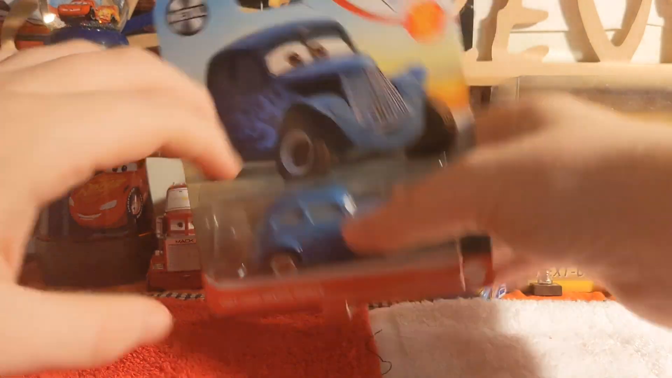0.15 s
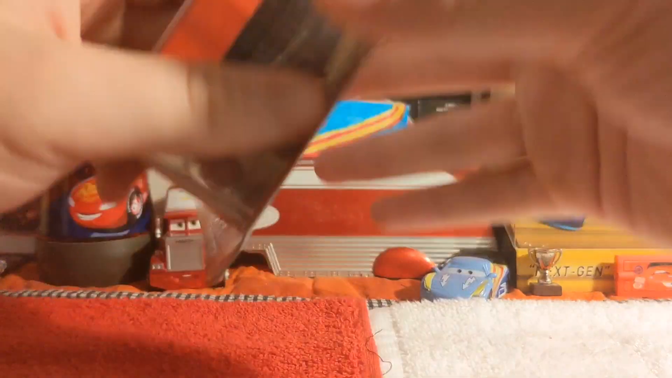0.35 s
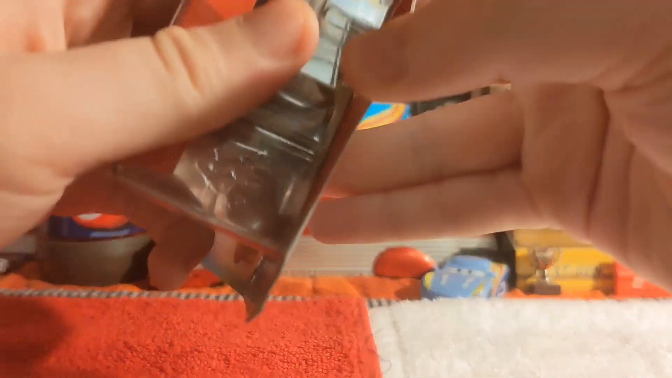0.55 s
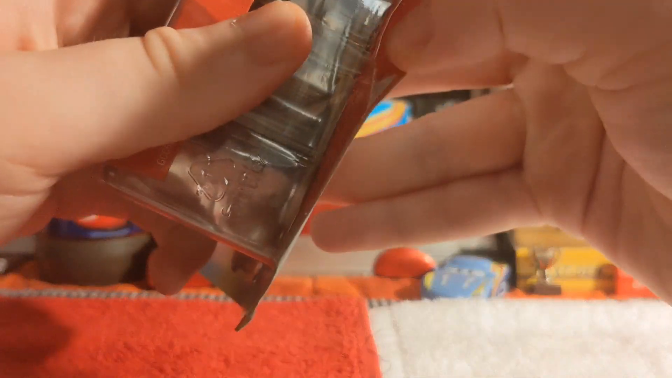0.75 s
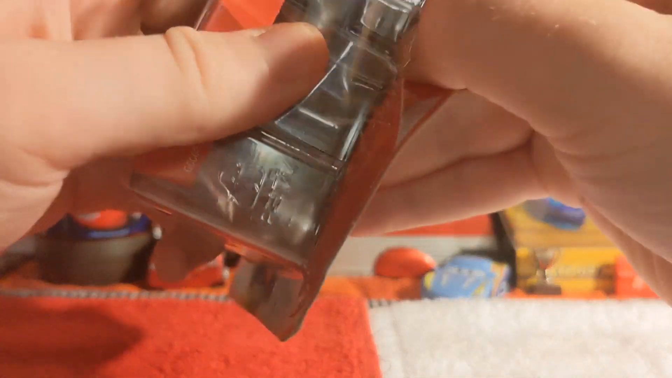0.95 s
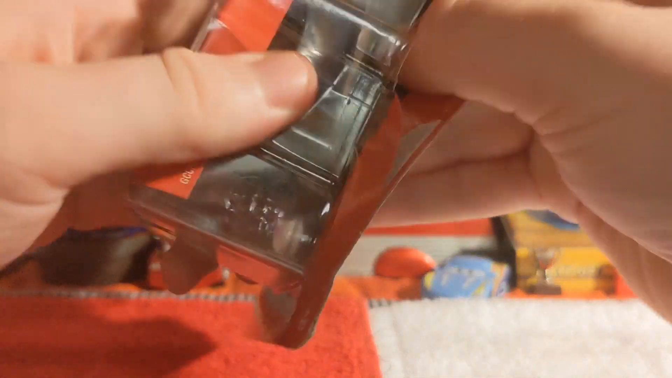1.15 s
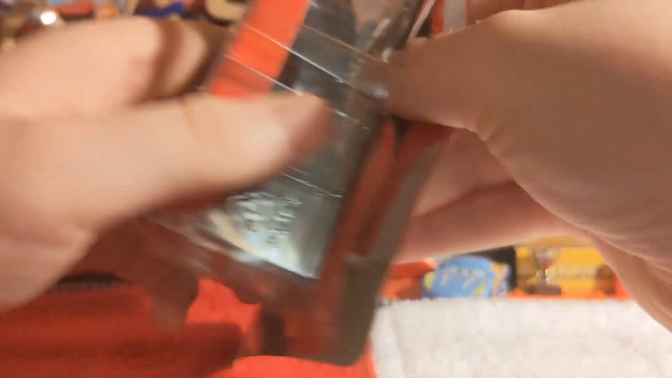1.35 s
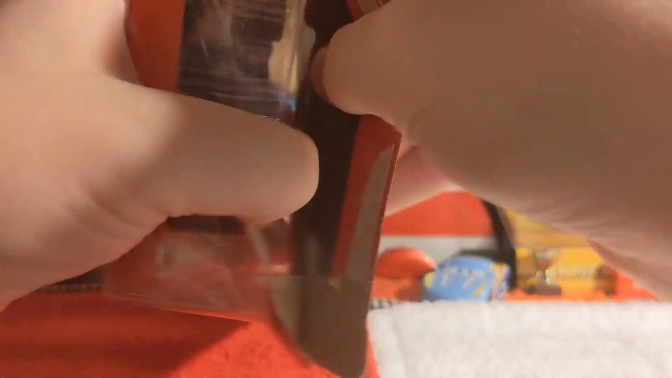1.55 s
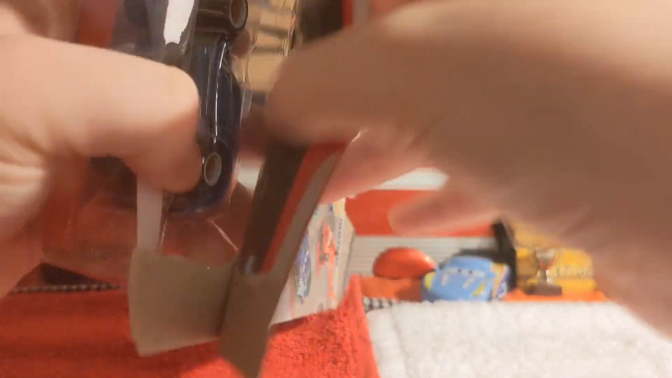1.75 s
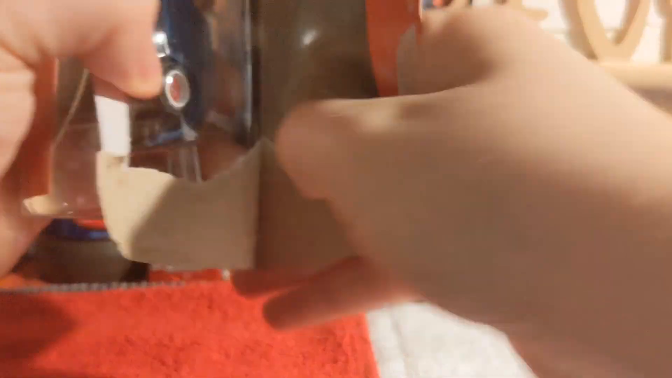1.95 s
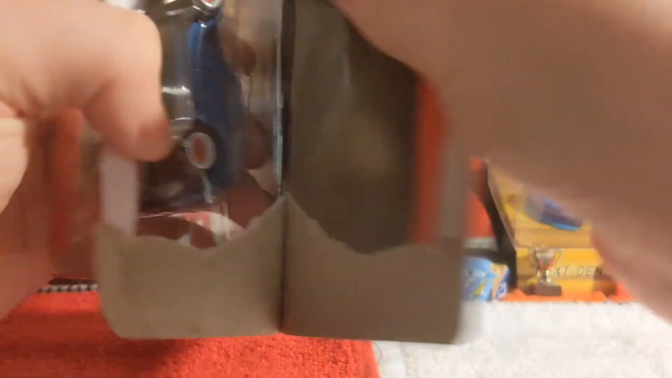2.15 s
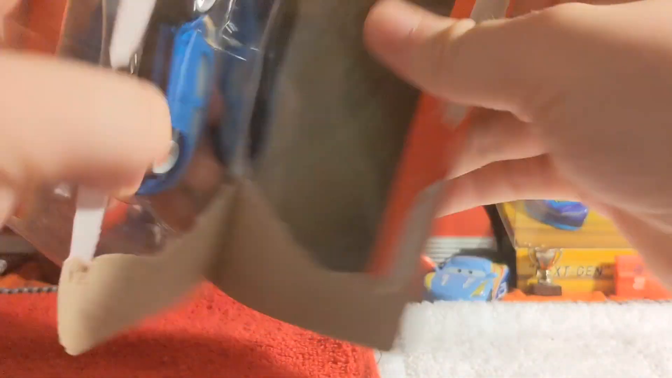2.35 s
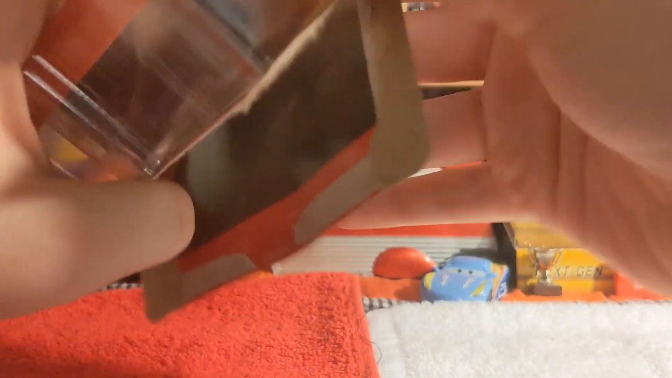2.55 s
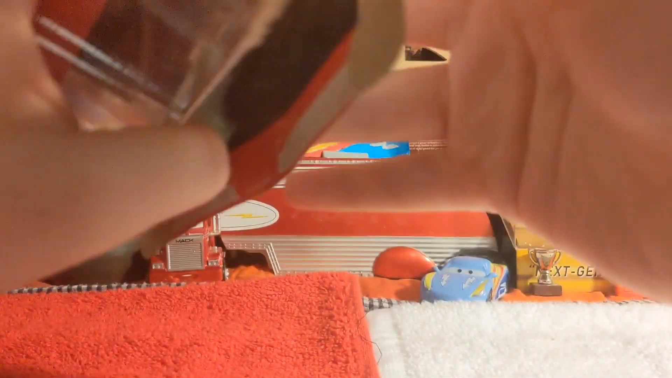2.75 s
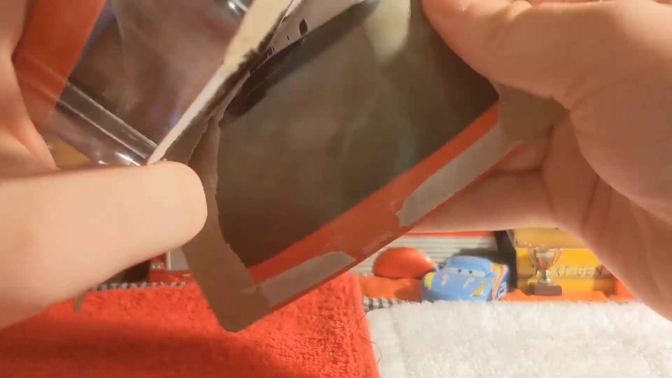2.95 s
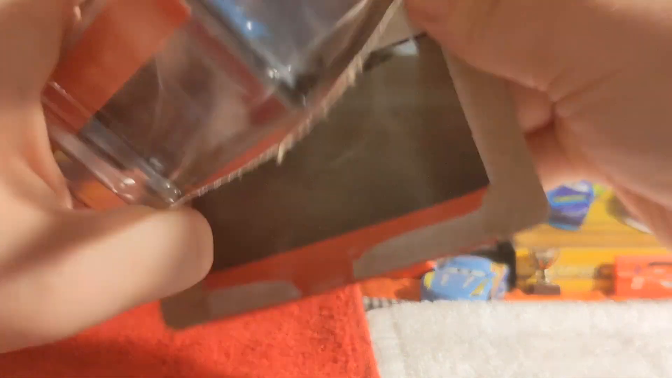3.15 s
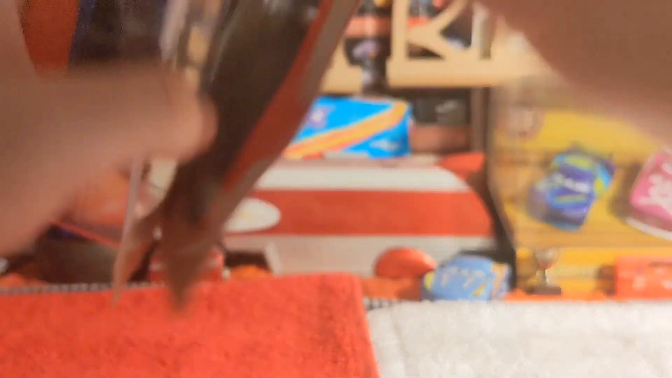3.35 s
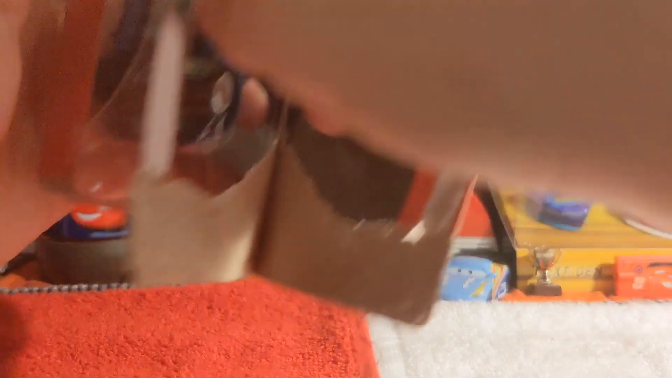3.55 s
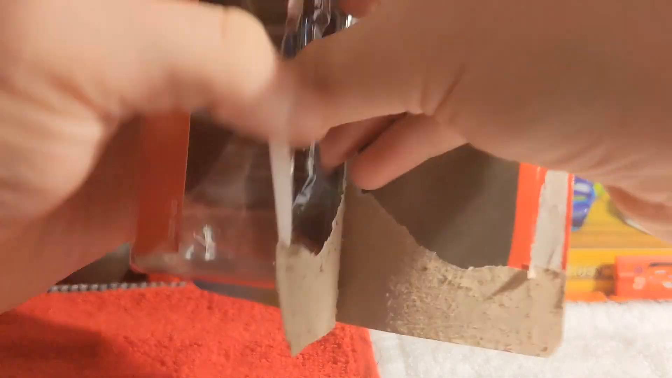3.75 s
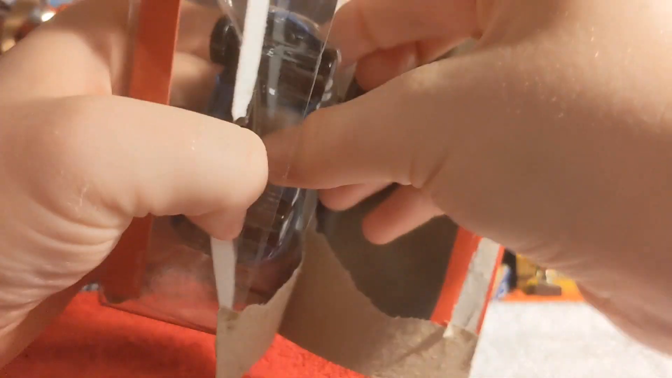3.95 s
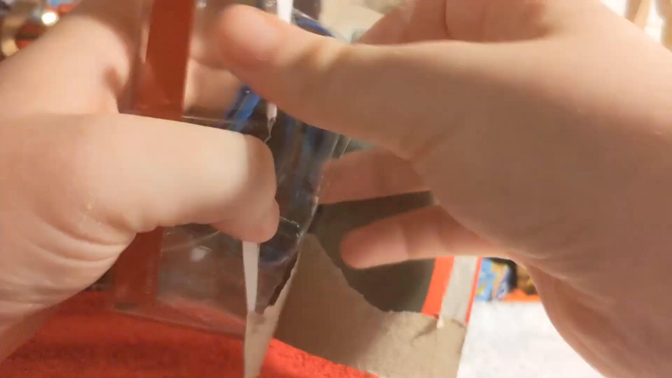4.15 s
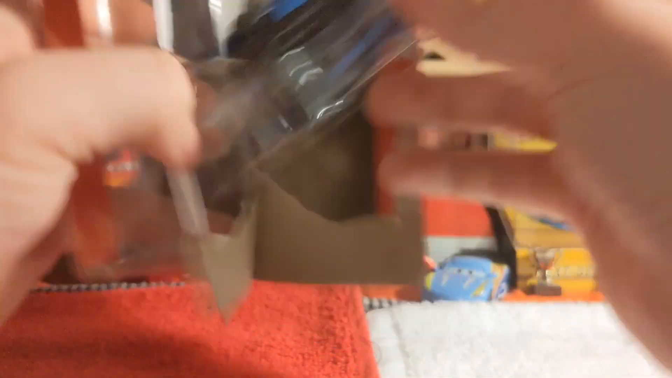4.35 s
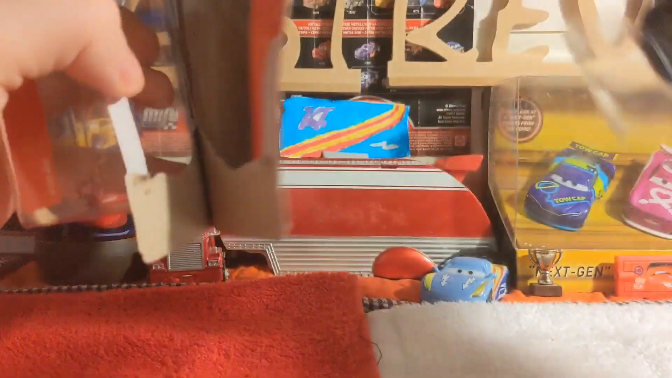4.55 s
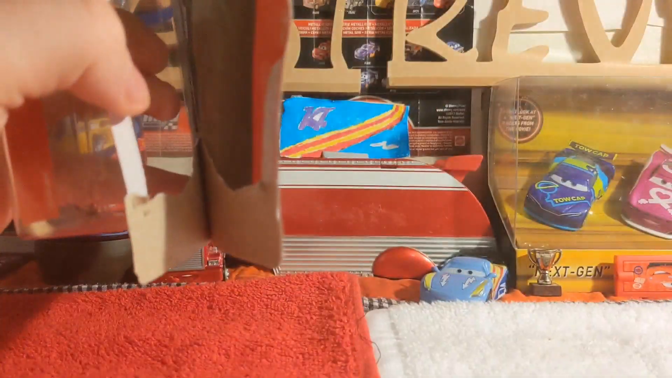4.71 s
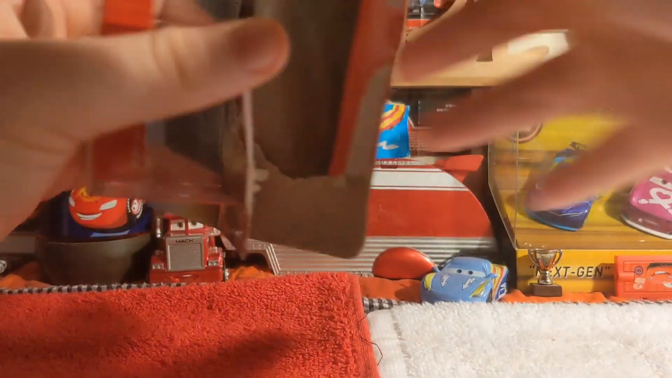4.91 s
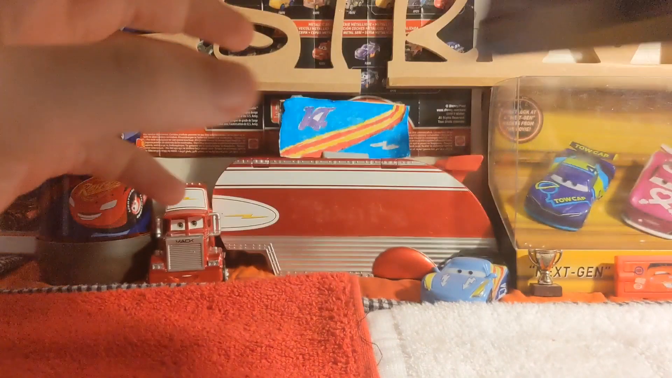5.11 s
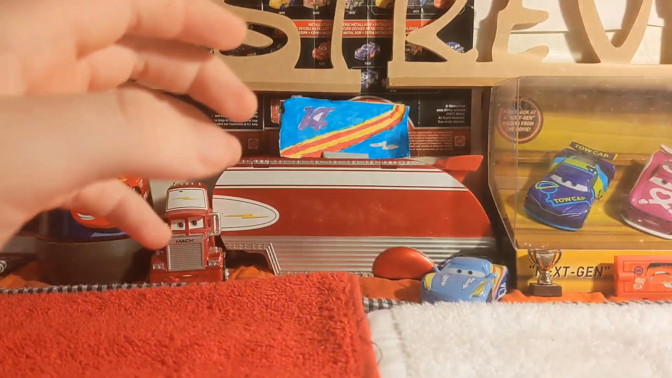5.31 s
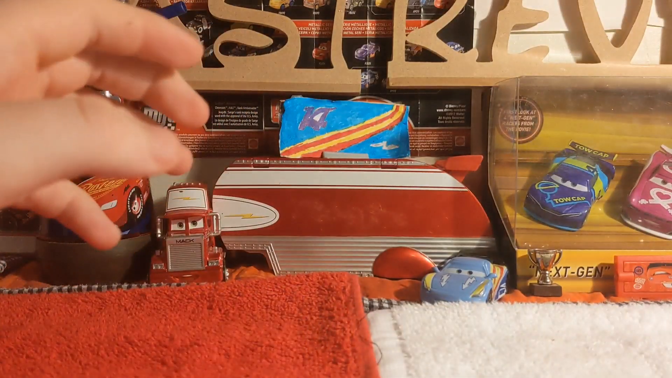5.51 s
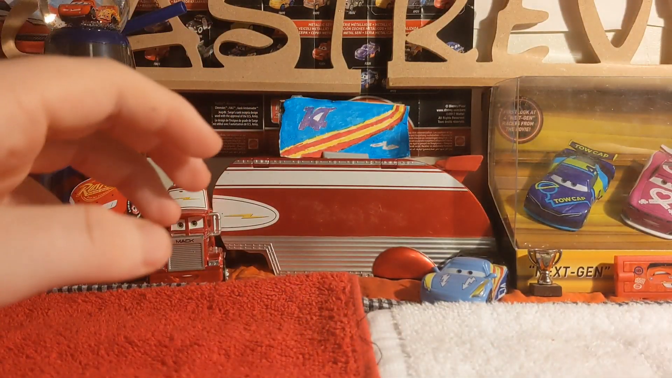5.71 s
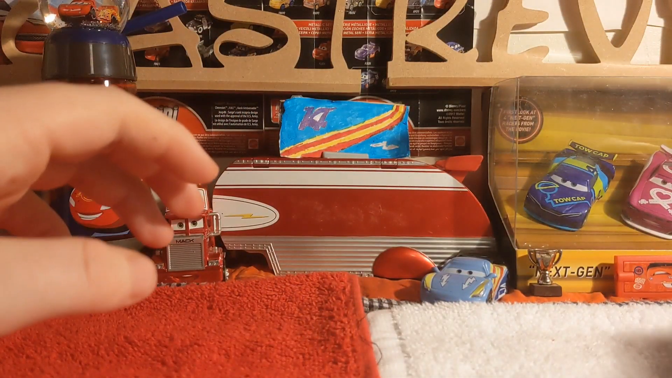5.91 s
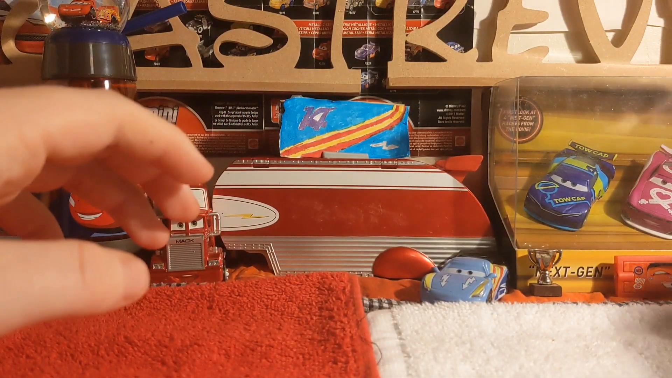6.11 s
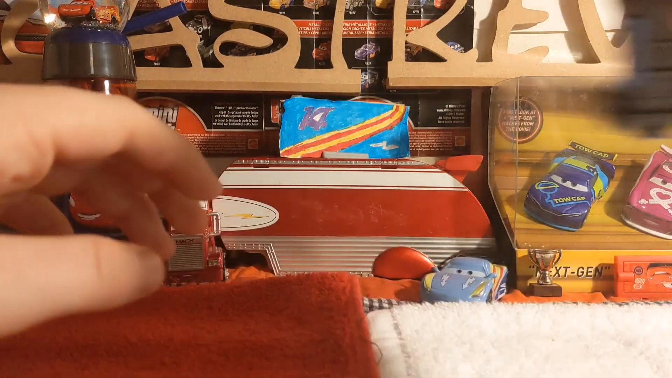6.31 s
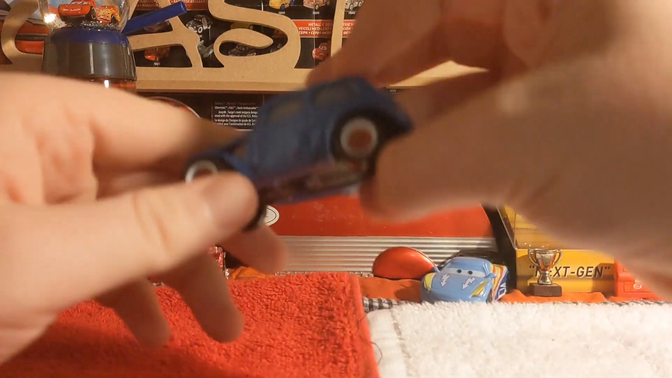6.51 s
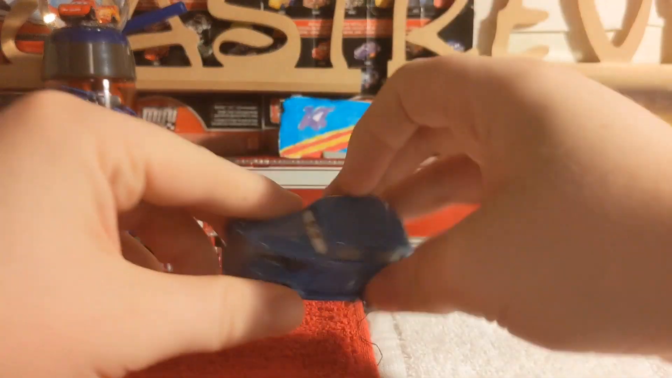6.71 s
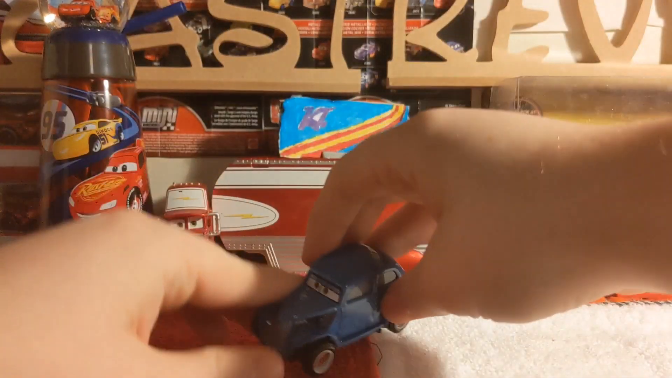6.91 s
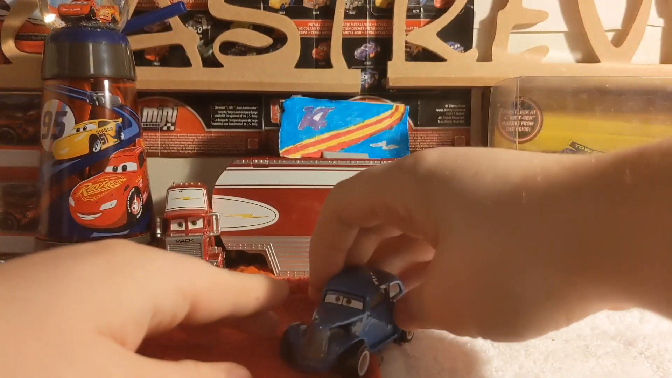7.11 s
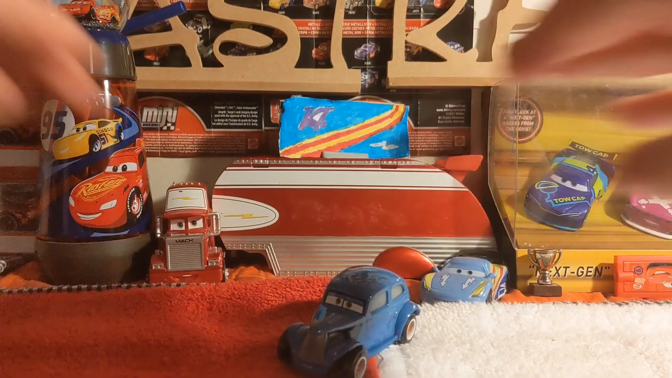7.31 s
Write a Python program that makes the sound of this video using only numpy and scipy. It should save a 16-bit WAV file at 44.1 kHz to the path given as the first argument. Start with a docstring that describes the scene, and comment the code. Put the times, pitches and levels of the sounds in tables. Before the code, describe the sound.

Everything is in the right channel, close and dry, over a faint steady room tone; the left is practically silent. Slight finger brushing and small pops open the scene. From about 0.6 s stiff plastic snaps sharply, crowding together between 0.9 and 1.8 s, with short fibrous cardboard rips near 1.25, 1.7 and 1.95 s and low jolts of the hands. From 2 to 2.9 s it eases to crinkles and light rubbing. A harder crackling rip comes at 2.97 s, then the densest, loudest snaps from 3.55 to 4.3 s, and a last tear around 4.4 s. After a lull, the emptied pack rustles and slides with a hollow stutter at 5.3-5.6 s. Faint handling follows; small bright ticks of the toy car come from 6.4 to 7 s, and a very soft bump and brush on the towel around 7.3 s.

```python
"""Fingers brush faintly, then plastic snaps: hands rip the card back off a toy car's blister, right ear only.
Shell snaps and dull panel pops are noise slips and single notes kicked through the pack's resonances.
Short crackling pulls are bursts of breaking fibres; the hands add low rustle and soft jolts.
The emptied pack slides with a hollow ring, the car ticks and is set down softly on a towel.
Sparse, fast-dying reflections and a steady room tone give the small room."""
import sys
import numpy as np
from scipy import signal
from scipy.io import wavfile
from scipy.ndimage import uniform_filter1d

SR = 44100
rng = np.random.default_rng(int(sys.argv[2]) if len(sys.argv) > 2 else 0)


def waveform_to_disk(signal):
    """Save audio, clipped to [-1, 1], as 16-bit WAV at the path in sys.argv[1]."""
    frames = np.transpose(np.atleast_2d(signal))
    scaled = np.clip(frames, -1, 1) * 32767
    samples = np.round(scaled).astype(np.int16)
    wavfile.write(sys.argv[1], SR, samples)


N = 329427
TIME = np.arange(N) / SR  # s

# Table levels are relative: each source trims them, and the microphone gain comes last.
# loud buckles of the blister: start_s, shell_db, panel_db, crack_db, panel_hz, rib_hz
BUCKLES = [(0.1402, -32, -30, -51, 660, 2040), (0.178, -38, -50, -70, 734, 1540),
           (0.2781, -25, -33, -44.5, 650, 2620), (0.396, -58, -75, -50, 996, 2800),
           (0.6222, -16, -37, -42.5, 684, 2630), (0.6416, -12, -37.5, -28, 707, 2840),
           (0.6955, -29.5, -70, -47, 1060, 3050), (0.7668, -13, -41, -19.5, 724, 2880),
           (0.8844, -11, -25.5, -33, 895, 1870), (0.8914, -13.5, -36, -44, 805, 2400),
           (0.942, -30, -38.5, -40.5, 896, 1710), (0.9754, -27, -29, -48, 710, 2380),
           (0.9911, -30, -29.5, -37, 556, 1800), (1.0097, -6.5, -29.5, -25, 950, 2540),
           (1.0325, -14.5, -34, -20.5, 674, 3400), (1.1129, -17.5, -28.5, -37.5, 819, 2540),
           (1.1861, -12, -34.5, -45, 805, 2880), (1.205, -29, -35.5, -38.5, 696, 1490),
           (1.2204, -16, -30, -31, 773, 2940), (1.2494, -16, -19.5, -22, 1050, 3160),
           (1.3197, -10, -25.5, -25, 910, 2690), (1.3241, -7.5, -37.5, -19, 910, 3030),
           (1.3457, -10.5, -32.5, -29.5, 600, 2940), (1.3593, -11.5, -36.5, -27, 1047, 2760),
           (1.5087, -10.5, -26.5, -27, 1045, 3180), (1.5977, -8.5, -22, -19, 1056, 1720),
           (1.623, -23, -32.5, -48, 1020, 2100), (1.6346, -25, -29, -36, 850, 1870),
           (1.6598, -13.5, -27, -25.5, 750, 3110), (1.6862, -13, -25, -29.5, 1330, 1450),
           (1.7114, -7.5, -31.5, -47, 1260, 1880), (1.733, -7.5, -39, -48, 1210, 1880),
           (1.7526, -15, -34.5, -30.5, 1086, 3610), (1.7879, -15, -35, -36.5, 1250, 3460),
           (1.8474, -25, -49, -48, 870, 2780), (1.952, -11, -26, -33, 736, 2820),
           (2.0264, -32, -39, -47.5, 525, 2890), (2.0557, -33, -42.5, -60, 848, 1400),
           (2.167, -29.5, -46, -59, 866, 3360), (2.2044, -33, -40, -45, 713, 2100),
           (2.3391, -35, -65, -41, 781, 3110), (2.4028, -27, -38.5, -66, 860, 1960),
           (2.6898, -21, -40.5, -41, 666, 2110), (2.7194, -28, -46, -47, 830, 1940),
           (2.825, -47, -42, -68, 810, 1800), (2.9642, -13.5, -28, -46, 760, 3120),
           (2.9767, -13.5, -28, -30.5, 730, 2850), (3.1043, -26.5, -42.5, -44, 885, 3060),
           (3.1348, -13.5, -31.5, -34.5, 805, 2780), (3.5524, -26, -33.5, -42, 900, 1400),
           (3.5565, -19.5, -32.5, -39.5, 923, 3330), (3.5979, -21.5, -34.5, -45, 1084, 3310),
           (3.6093, -19.5, -30, -51, 1310, 1400), (3.6696, -18.5, -28.5, -27, 960, 1940),
           (3.676, -11.5, -31, -30, 880, 1810), (3.7398, -14.5, -31, -30.5, 900, 1870),
           (3.7577, -4.5, -24, -25, 910, 3060), (3.7838, -6.5, -28.5, -25.5, 1310, 1960),
           (3.813, -15.5, -27, -55.5, 780, 2170), (3.8686, -27, -36, -43, 1120, 2130),
           (3.9, -5.5, -30, -20, 890, 3330), (4.0167, -31, -27, -55, 549, 1490),
           (4.0525, -19, -26, -61, 1163, 1470), (4.1268, -6, -20.5, -29, 864, 2220),
           (4.1342, -18, -21.5, -41, 860, 2320), (4.1473, -9, -34.5, -34.5, 1120, 3080),
           (4.2257, -21.5, -37.5, -44.5, 856, 2540), (4.2522, -8, -21.5, -31.5, 810, 3070),
           (4.2564, -15.5, -21.5, -41, 937, 3140), (4.3554, -30, -40.5, -57, 720, 2470),
           (4.7355, -28.5, -36, -50, 986, 1520), (4.7971, -32, -43, -44, 1020, 2810),
           (4.9921, -29, -42.5, -55, 1010, 2040), (5.0605, -23, -37, -46, 1190, 1850),
           (5.0714, -30, -40, -46, 891, 2720), (5.125, -25, -35.5, -54.5, 726, 2610),
           (5.137, -25, -38, -43, 1026, 3340), (5.3395, -30.5, -37, -52, 860, 1400),
           (5.3527, -29, -41.5, -51, 1018, 2760), (5.3734, -39, -39.5, -62, 910, 1410),
           (5.448, -23.5, -32, -43.5, 1300, 1400), (5.4588, -28.5, -30, -52, 866, 1730),
           (5.48, -39, -38.5, -63, 870, 1490), (5.5204, -49, -42, -62, 860, 1470),
           (5.5553, -32.5, -43, -63, 870, 1420), (5.6052, -36, -43.5, -60, 860, 1460),
           (5.9628, -20.5, -38.5, -47.5, 595, 1700), (6.0064, -36.5, -48, -60, 1190, 3400),
           (6.1474, -39, -48, -60, 717, 2860)]
# card rips that swell, then let go: climax_s, level_db, build_s, release_s, body_re_level_db, fizz_re_level_db
CARD_RIPS = [(1.254, -25.5, 0.018, 0.013, -1, -1.5), (1.68, -25, 0.022, 0.02, -3.5, -2.5),
             (1.96, -27, 0.024, 0.015, -5, -1), (2.97, -23.5, 0.016, 0.01, -10, -3),
             (4.418, -27.5, 0.022, 0.017, -12.5, -4.5)]
# card peels or slides on plastic: start_s, length_s, level_db, body_re_level_db, fizz_re_level_db
CARD_RUBS = [(0.298, 0.03, -47, -1.5, -7.5), (0.471, 0.12, -64, -5, -6), (0.684, 0.059, -56.5, -12, 1.5),
             (0.819, 0.1, -51, -10.5, -5.5), (0.941, 0.13, -47, -5, -3.5), (1.094, 0.046, -47.5, 4, -15),
             (1.325, 0.04, -44, -7.5, 2.5), (1.405, 0.04, -49.5, 2, -12.5),
             (1.478, 0.082, -49.5, 5.5, -10.5), (1.802, 0.027, -54, -13, -6), (1.892, 0.016, -39, -9, -5.5),
             (2.003, 0.089, -55, -0.5, -5), (2.117, 0.13, -45, -5.5, -4.5), (2.222, 0.061, -44.5, -11, 1),
             (2.278, 0.054, -46, -9.5, -4.5), (2.352, .045, -55, -0.5, -3),
             (2.411, 0.038, -41.5, -11, -4.5), (2.491, 0.039, -53.5, -5.5, -6.5),
             (2.584, 0.03, -48, -5.5, -5), (2.713, 0.044, -44.5, -4.5, -9), (2.819, 0.088, -46, -6.5, -5),
             (3.032, .075, -59, 1, -2), (3.169, .09, -46, -7, -1.5), (3.269, 0.1, -54.5, -1, -4.5),
             (3.406, 0.032, -55.5, 1.5, -8), (3.463, 0.16, -53, -1.5, -7), (3.633, .1, -45, -5, -5),
             (3.716, 0.11, -44, -2, -7.5), (3.903, 0.071, -42.5, 2, -12.5), (4.022, 0.14, -47, 0.5, -7.5),
             (4.196, 0.083, -49.5, 2.5, -11), (4.347, 0.05, -36, -2.5, -15), (4.463, 0.026, -40, -8.5, -9),
             (4.499, .06, -69, -3, 0.5), (4.721, 0.027, -45, 3, -9), (4.79, .018, -39.5, -3, -8),
             (4.975, .16, -53, 2, -5.5), (5.327, 0.28, -58, -2.5, -7.5), (5.774, 0.061, -65.5, 1.5, -7),
             (5.818, 0.22, -58, -3.5, -9), (6.079, 0.14, -62, 2, -10), (6.475, .18, -60.5, -12, -4),
             (7.29, 0.11, -69, -5, -3.5)]
# the emptied pack slides away: start_s, length_s, level_db
PACK_SLIDE = (5.34, 0.286, -51.5)
# hollow ring of the empty pack: pitch_hz, decay_s, level_db
HOLLOW_MODES = [(880, .007, 2), (1050, 0.0043, 0)]
# toy car ticks between the fingers: start_s, level_db, pitch_hz
WHEEL_TICKS = [(6.3712, -52.5, 2410), (6.4078, -47.5, 3510), (6.5179, -39.5, 2820), (6.6079, -40, 3100),
               (6.6414, -39.5, 2470), (6.7114, -47.5, 2480), (6.791, -48.5, 3290), (6.9819, -44.5, 2430)]
# the pack gives way and jolts the hands: start_s, level_db, pitch_hz
HAND_JOLTS = [(0.997, -39.5, 190), (1.253, -25.5, 283), (1.262, -41, 120), (1.54, -39.5, 240),
              (1.953, -42, 170), (2.752, -44, 110), (3.106, -39.5, 222), (3.189, -49, 70),
              (3.502, -42, 262), (4.129, -53, 198), (4.361, -37.5, 171), (4.412, -43, 64.5),
              (4.741, -49.5, 130.7), (4.801, -47, 80), (5.389, -47.5, 90), (5.45, -47, 228),
              (5.68, -54.5, 120), (6.146, -49.5, 159), (7.28, -57, 219)]
# moving hands: time_s, rustle_db, brush_db
HAND_MOTION = [(0.0, -83, -72.5), (0.6, -79, -70), (1.06, -86, -58.5), (1.56, -59, -58.5),
               (1.81, -58, -54.5), (2.49, -64.5, -63.5), (2.81, -54.5, -57.5), (3.51, -62, -66),
               (3.81, -59, -52), (4.28, -65, -57.5), (4.51, -78, -74.5), (4.89, -65.5, -66.5),
               (5.32, -73.5, -78.5), (5.51, -60, -72), (5.66, -65.5, -75.5), (5.93, -76, -72),
               (6.97, -77.5, -76.5), (7.47, -70.5, -73.5)]
# spectrum of the wide panels: freq_hz, gain_db
PANEL_SHAPE = [(25, -41), (130, -16), (260, -2), (400, -3), (600, 1.5), (880, 2.5), (1200, 1.5),
               (1600, -4.5), (3000, -52)]
# spectrum of the stiff shell: freq_hz, gain_db
SHELL_SHAPE = [(600, -31), (1100, -24), (1400, -8.5), (2200, -0.5), (2550, 1), (3050, 4), (3450, 1.5),
               (4000, -11.5), (5000, -17), (9000, -51)]
# spectrum of the sharp creases: freq_hz, gain_db
CREASE_SHAPE = [(2000, -25), (3600, 3.5), (4300, 0), (4900, 0), (5700, 4.5), (7000, -1), (9300, -4.5),
                (11300, -1.5), (12600, -9), (13800, -6), (16000, -5.5)]
# spectrum of the hands' thud and rustle: freq_hz, gain_db
THUD_SHAPE = [(20, -24), (60, -3), (130, 1), (240, -2), (350, -8), (600, -26), (1500, -55)]
# damping, slow for soft panel pops, fast for stiff shell snaps: shell_minus_panel_db, decay_s
BUCKLE_DAMPING = [(-11, 0.0053), (19, 0.0019)]
# spectrum of the room tone: freq_hz, gain_db
ROOM_TONE = [(25, -9.5), (120, 3), (300, -9.5), (800, -15.5), (1400, -17.5), (3200, -21.5), (6500, -19.5),
             (16000, -32.5)]
# reverberation time of the room: freq_hz, t60_s
ROOM_DECAY = [(150, 0.11), (800, 0.071), (3000, 0.039), (12000, 0.041)]

GIVE_S = 0.0005  # a dent yields this long before it breaks
RISE_S, RIB_DECAY_S = 0.00012, 0.0014
SLIP_SHARE = 0.35  # share of samples that carry a slip
FIBRE_HISS = 0.7  # hiss rms re the fibre clicks
CRINKLE_CYCLES = 2.5  # decay time of a dent's note, in cycles
JOLT_DECAY_S = 0.0051
# a rub starts and stops more slowly the longer it is: shortest times, plus a share of its length
RUB_ATTACK_S, RUB_RELEASE_S, RUB_EASE = 0.0099, 0.005, 0.057
BAND_EDGE_HZ = 16150


def snaps(panel_db=-1, shell_db=-14, crack_db=-3, strain_db=-32, strain_fizz_db=-6, strain_s=0.0042):
    """Loud buckles; the plastic creaks under exponentially rising strain just before each break."""
    out, t = np.zeros(N), TIME[:1024]
    strain = np.exp((t - t[-1]) / strain_s)
    for start_s, mid_db, low_db, high_db, panel_hz, rib_hz in BUCKLES:
        break_s = start_s + GIVE_S
        hit = buckle(low_db + panel_db, mid_db + shell_db, high_db + crack_db, panel_hz, rib_hz)
        add(out, break_s, hit)
        slips = rng.standard_normal(len(t))
        creak = unit(colour(slips, SHELL_SHAPE))
        creak = creak + amp(strain_fizz_db) * unit(colour(slips, CREASE_SHAPE))
        add(out, break_s - t[-1], amp(mid_db + strain_db) * creak * strain)
    return out


def buckle(low_db, mid_db, high_db, panel_hz, rib_hz, panel_ring=1.31, panel_slow=1.27, shell_ring=0.72,
           after=0.093, after_s=0.012, first=0.6, first_s=0.00076, top_slope=0.67, top_db=3):
    """A hard break and a run of slips kick the pack's dense modes; one panel and one rib ring on."""
    t = TIME[:2048]
    onset = 1 - np.exp(-t / RISE_S)
    decay_s = np.interp(mid_db - low_db, *np.transpose(BUCKLE_DAMPING))
    # the first break, then a faint shiver
    edge = first * np.exp(-t / first_s) + after * np.exp(-t / after_s)
    kick = onset * (np.exp(-t / decay_s) + edge)
    slips = rng.standard_normal((3, len(t))) * (rng.random(len(t)) < SLIP_SHARE)
    panel_slips, shell_slips, crack_slips = slips * kick

    flip = colour(1.0 * (t == 0), PANEL_SHAPE)  # a panel flips over in one go
    panel = unit(colour(panel_slips, PANEL_SHAPE))
    panel = panel + panel_ring * mode(flip, panel_hz, panel_slow * decay_s)
    shell = colour(shell_slips, SHELL_SHAPE)
    shell = unit(shell) + shell_ring * mode(shell, rib_hz, RIB_DECAY_S)
    lift_db = top_db + top_slope * min(high_db - mid_db, 5)
    crack = brighten(colour(crack_slips, CREASE_SHAPE), lift_db)
    return blow(panel, low_db) + blow(shell, mid_db) + blow(crack, high_db)


def ticks(level, body, fizz, count=130, panel_db=-1, shell_db=0, crack_db=-8, spread_db=4, colour_db=6,
          ceiling_db=-47, low_hz=600, high_hz=1200, rib_ratio=2.8):
    """Small buckles at random moments, soft or stiff, follow the effort's level up to a ceiling."""
    out = np.zeros(N)
    for when, strength, pitch, stiff in rng.random((count, 4)):
        at = int(when * N)
        db = min(level[at], ceiling_db) + spread_db * (2 * strength - 1)
        lean_db = colour_db * (2 * stiff - 1)  # stiff: more shell, less panel
        low_db = db + body[at] + panel_db - lean_db
        mid_db = db + shell_db + lean_db
        high_db = db + fizz[at] + crack_db
        hz = low_hz + pitch * (high_hz - low_hz)
        add(out, at / SR, buckle(low_db, mid_db, high_db, hz, hz * rib_ratio))
    return out


def tearing(level, body, fizz, body_db=-3, shell_db=-3, fizz_db=-2, catch_db=3.5, fizz_catch_db=2.5,
            crinkle_db=-6, top_slope=0.09, top_fizz=0.47, top_db=7.0):
    """Fibres break in clumps as the card catches and slips; each break sounds through all of the pack."""
    fibres = crackle(per_s=2500, spread_db=4) + FIBRE_HISS * rng.standard_normal(N)
    catches = wander(130)
    voices = [(PANEL_SHAPE, body + body_db, catch_db),
              (SHELL_SHAPE, shell_db, catch_db),
              (CREASE_SHAPE, fizz + fizz_db, fizz_catch_db)]
    card = np.zeros(N)
    for shape, voice_db, depth_db in voices:
        clumps = fibres * amp(depth_db * catches)
        card += amp(level + voice_db) * unit(colour(clumps, shape))
    # a hard, fibrous pull is brighter than a gentle slide
    card = brighten(flex(card), top_db + top_slope * level + top_fizz * fizz)
    return card + amp(level + body / 2 + crinkle_db) * crinkle()


def effort(brush_db=-3, rest_body_db=-1, rest_fizz_db=-6):
    """Rips grow and die exponentially; rubs rise, hold and release. Level, body and fizz in dB over time."""
    time_s, _, brush = np.transpose(HAND_MOTION)
    # the fingers never lie quite still
    strokes = [(amp(np.interp(TIME, time_s, brush) + brush_db), rest_body_db, rest_fizz_db)]
    for climax_s, db, build_s, release_s, body, fizz in CARD_RIPS:
        fall = np.maximum((climax_s - TIME) / build_s, (TIME - climax_s) / release_s)
        strokes.append((amp(db) * np.exp(-fall), body, fizz))
    for start_s, length_s, db, body, fizz in CARD_RUBS:
        attack_s = RUB_ATTACK_S + RUB_EASE * length_s
        release_s = RUB_RELEASE_S + RUB_EASE * length_s
        rise = np.clip((TIME - start_s) / attack_s, 0, 1)
        fade = np.exp(-np.clip((TIME - start_s - length_s) / release_s, 0, 20))
        strokes.append((amp(db) * rise * fade, body, fizz))
    power = sum(np.outer(amp([0, body, fizz]) ** 2, gain ** 2) for gain, body, fizz in strokes)
    level, low, high = 10 * np.log10(power)
    return level, low - level, high - level


def crinkle(per_s=150, spread_db=4, count=16):
    """Small dents flip all over the blister, each with a short damped note."""
    notes_hz = np.geomspace(350, 3400, count) * rng.uniform(0.94, 1.06, count)
    dents = np.zeros(N)
    for hz in notes_hz:
        dents += mode(crackle(per_s / count, spread_db), hz, CRINKLE_CYCLES / hz)
    low_cut = signal.butter(2, notes_hz[0] / 2, "high", fs=SR, output="sos")
    return unit(signal.sosfilt(low_cut, dents))


def flex(x, depth_db=3.2, size=512):
    """As the sheet bends, its many resonances come and go in small time-frequency patches."""
    z = signal.stft(x, nperseg=size)[2]
    patches = uniform_filter1d(rng.standard_normal(z.shape), size=3, axis=0)
    patches = unit(uniform_filter1d(patches, size=4, axis=1))
    return signal.istft(z * amp(depth_db * patches), nperseg=size)[1][:N]


def slide():
    """The empty blister stutters over the table; every catch rings its hollow."""
    start_s, length_s, db = PACK_SLIDE
    catches = crackle(per_s=210, spread_db=5) * (TIME > start_s) * (TIME < start_s + length_s)
    ring = np.zeros(N)
    for hz, decay_s, mode_db in HOLLOW_MODES:
        ring += amp(mode_db) * mode(catches, hz, decay_s)
    # the level holds over the slide, not over the whole scene
    return amp(db) * unit(ring) * np.sqrt(length_s * SR / N)


def car(tick_db=-8, edge_db=-10, ring=0.58, contact_s=0.0028, ring_s=0.0051):
    """Loose wheels knock on the little body: a short noise contact and one bright ring."""
    out, t = np.zeros(N), TIME[:2048]
    for start_s, db, hz in WHEEL_TICKS:
        contact = rng.standard_normal(len(t)) * np.exp(-t / contact_s)
        body = colour(contact, SHELL_SHAPE)
        edge = amp(edge_db) * unit(colour(contact, CREASE_SHAPE))
        tick = unit(body) + ring * mode(body, hz, ring_s) + edge
        add(out, start_s, blow(tick, db + tick_db))
    return out


def handling(level, rustle_db=-1, grip_db=-17, lumpy_db=3, jolt_noise_db=-7):
    """Lumpy low noise from the hands swells as they pull; every jolt adds a short low note."""
    rustle = colour(rng.standard_normal(N) * amp(lumpy_db * wander(40)), THUD_SHAPE)
    time_s, low_db, _ = np.transpose(HAND_MOTION)
    motion = amp(np.interp(TIME, time_s, low_db) + rustle_db)
    out = np.hypot(motion, amp(level + grip_db)) * unit(rustle)
    t = TIME[:4096]
    fade = np.exp(-t / JOLT_DECAY_S)
    for start_s, db, hz in HAND_JOLTS:
        note = np.sin(2 * np.pi * hz * t) * fade * (1 - np.exp(-t * hz * 2))
        noise = unit(colour(rng.standard_normal(len(t)) * fade, THUD_SHAPE))
        thud = unit(note) + amp(jolt_noise_db) * noise
        early_rms = np.sqrt(np.mean(thud[t < 2 * JOLT_DECAY_S] ** 2))
        add(out, start_s, amp(db) * thud / early_rms)
    return out


def room(x, gap_s=0.0028, size=256):
    """A small furnished room: sparse random reflections, decaying at each frequency's T60."""
    count = SR // 2
    taps = rng.standard_normal(count) * (rng.random(count) < 0.1) * (TIME[:count] > gap_s)
    hz, t, z = signal.stft(taps, SR, nperseg=size)
    decay = np.exp(-np.log(1000) * t / read(ROOM_DECAY, hz)[:, None])
    tail = signal.istft(z * decay, SR, nperseg=size)[1]
    return signal.fftconvolve(x, tail / np.linalg.norm(tail))[:N]


def room_tone():
    """Steady noise of rms 1 in the quiet room's spectrum."""
    return unit(colour(rng.standard_normal(N), ROOM_TONE))


def amp(db):
    """Decibels to gain."""
    return 10 ** (np.asarray(db) / 20)


def unit(x):
    """Scales to rms 1."""
    return x / np.sqrt(np.mean(x ** 2) + 1e-20)


def blow(x, db):
    """Gives a hit the rms level db over its first 6 ms."""
    return amp(db) * x / np.sqrt(np.mean(x[:265] ** 2) + 1e-20)


def add(mix, start_s, sound):
    """Mixes a sound in at start_s."""
    part = mix[max(round(start_s * SR), 0):][:len(sound)]
    part += sound[:len(part)]


def read(points, hz):
    """Reads a table on a log-frequency axis."""
    freq_hz, value = np.transpose(points)
    return np.interp(np.log(hz + 1), np.log(freq_hz), value)


def colour(x, points, size=2048):
    """Minimum-phase filter with the given spectrum, so that attacks stay sharp."""
    hz = abs(np.fft.fftfreq(size, 1 / SR))
    log_gain = np.log(amp(read(points, hz)))
    taps = np.fft.ifft(np.exp(np.conj(signal.hilbert(log_gain)))).real[:size // 2]
    return signal.fftconvolve(x, taps)[:len(x)]


def brighten(x, db, corner_hz=8500):
    """Lifts or lowers the treble above corner_hz by db."""
    high_pass = signal.butter(2, corner_hz, "high", fs=SR, output="sos")
    return x + (amp(db) - 1) * signal.sosfiltfilt(high_pass, x)


def mode(kick, hz, decay_s):
    """One damped resonance of rms 1, set ringing by a kick."""
    pole = np.exp((2j * np.pi * hz - 1 / decay_s) / SR)
    return unit(signal.lfilter([1], [1, -pole], kick).imag)


def wander(hz):
    """Smooth random curve of rms 1 with hz new values a second."""
    knots = rng.standard_normal(N)
    return unit(np.interp(TIME * hz, np.arange(N), knots))


def crackle(per_s, spread_db):
    """Clicks of random time and sign, many small and a few large; rms 1."""
    at = np.flatnonzero(rng.random(N) < per_s / SR)
    size_db = spread_db * np.minimum(rng.exponential(1, len(at)), 4)
    clicks = np.zeros(N)
    clicks[at] = amp(size_db) * np.sign(rng.random(len(at)) - 0.5)
    return unit(clicks)


def scene(room_db=-19, quiet_db=-71, mic_db=5):
    """Pack, hands and car, their echo and the room tone, at one microphone."""
    level, body, fizz = effort()
    near = snaps() + ticks(level, body, fizz) + tearing(level, body, fizz)
    near = near + slide() + car() + handling(level)
    mono = near + amp(room_db) * room(near) + amp(quiet_db) * room_tone()
    return amp(mic_db) * np.array([mono, mono])


def record(dry, idle_db=-99):
    """Microphone on the right, faint low electrical noise on the left; a linear-phase FIR limits the band."""
    idle = amp(idle_db) * unit(signal.lfilter([1], [1, -0.99], rng.standard_normal(N)))
    low_pass = signal.firwin(255, BAND_EDGE_HZ, window=("kaiser", 9), fs=SR)
    return signal.oaconvolve(np.array([idle, dry[1]]), low_pass[None], "same", axes=1)


dry = scene()
out = record(dry)
waveform_to_disk(out)
```